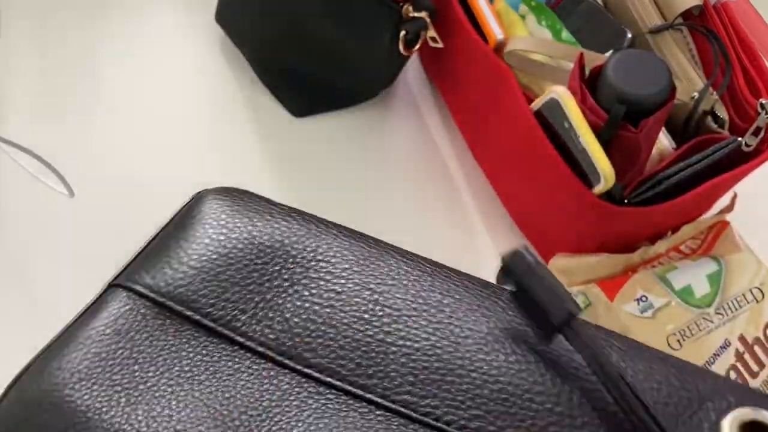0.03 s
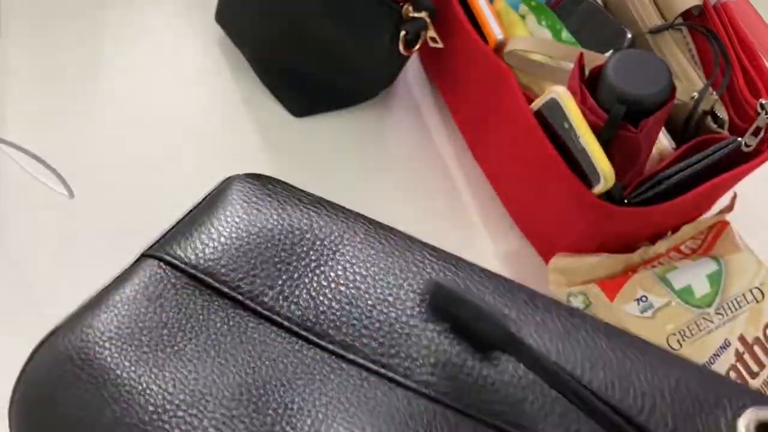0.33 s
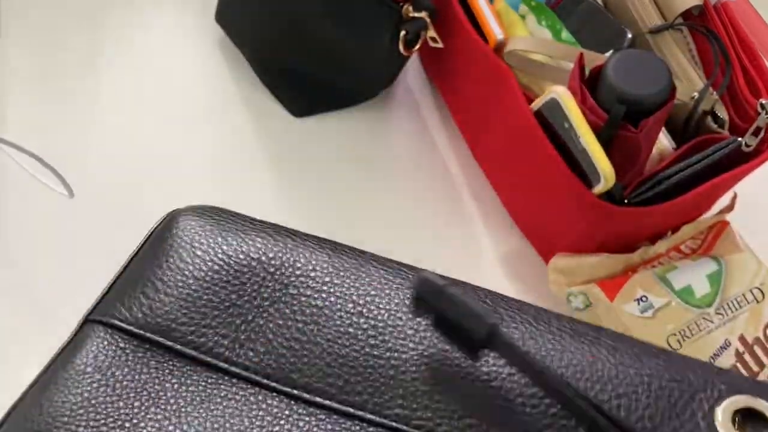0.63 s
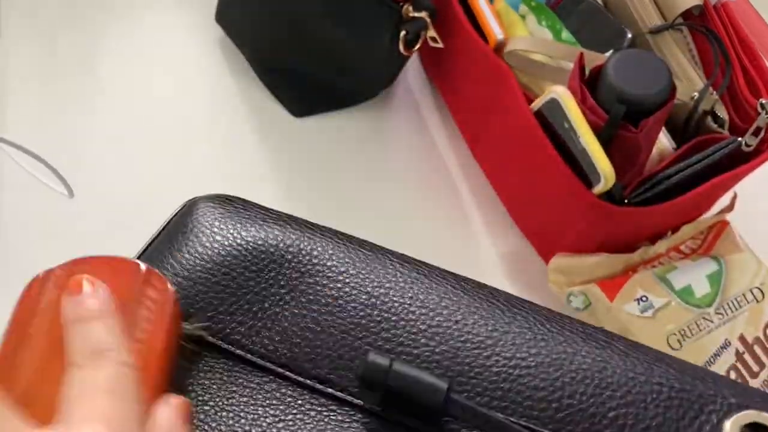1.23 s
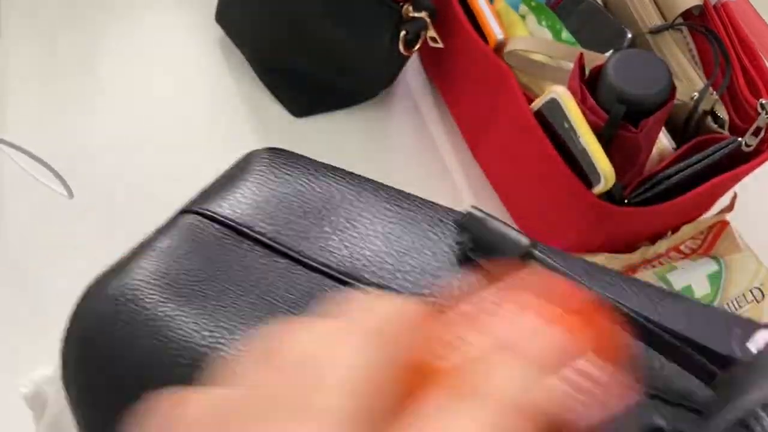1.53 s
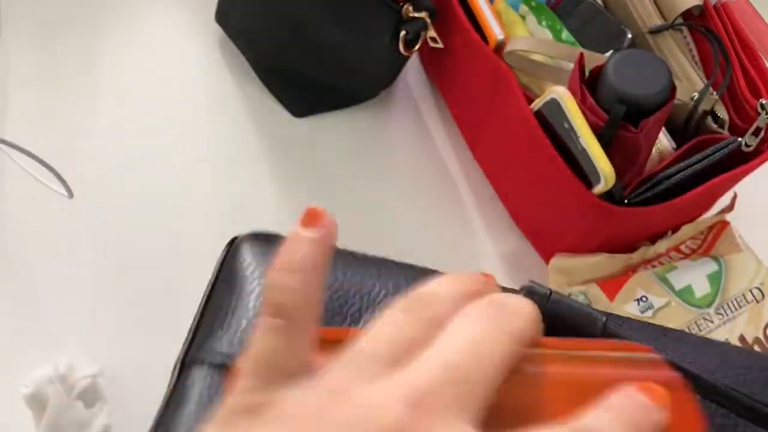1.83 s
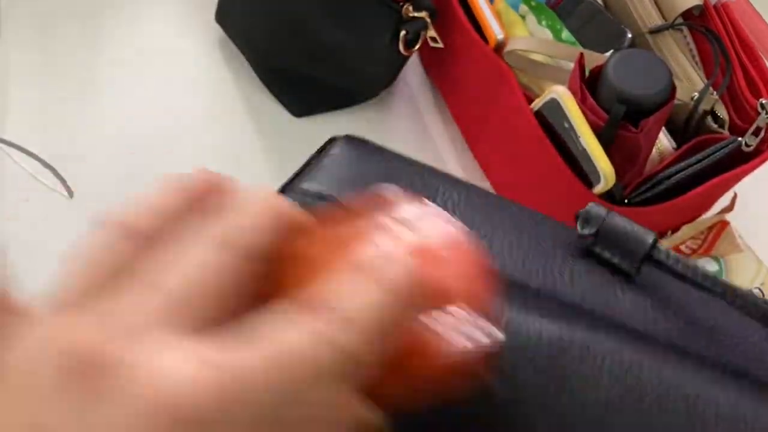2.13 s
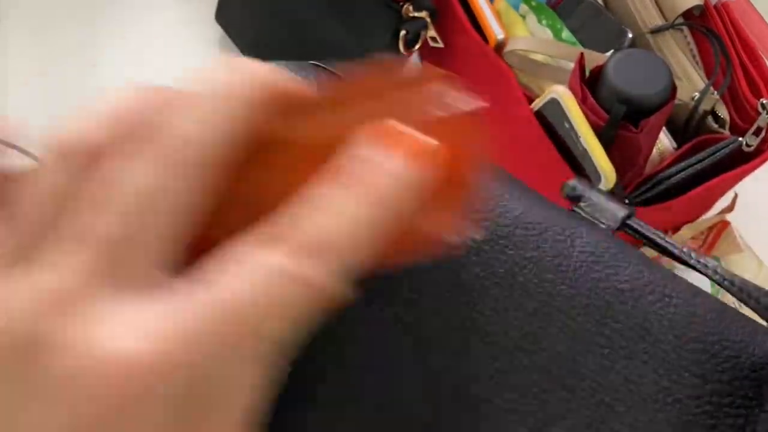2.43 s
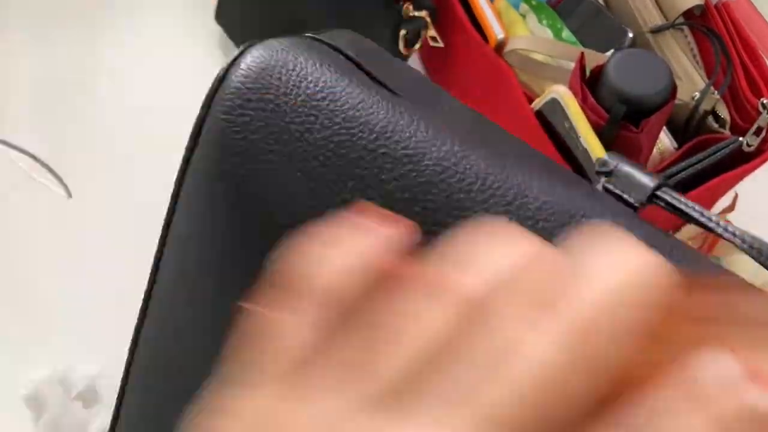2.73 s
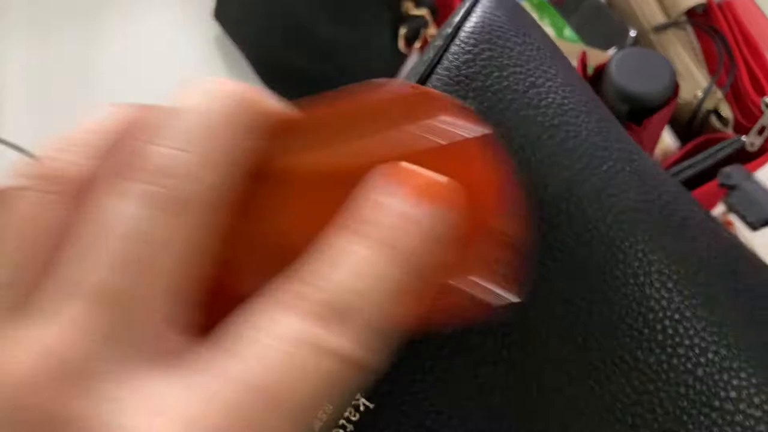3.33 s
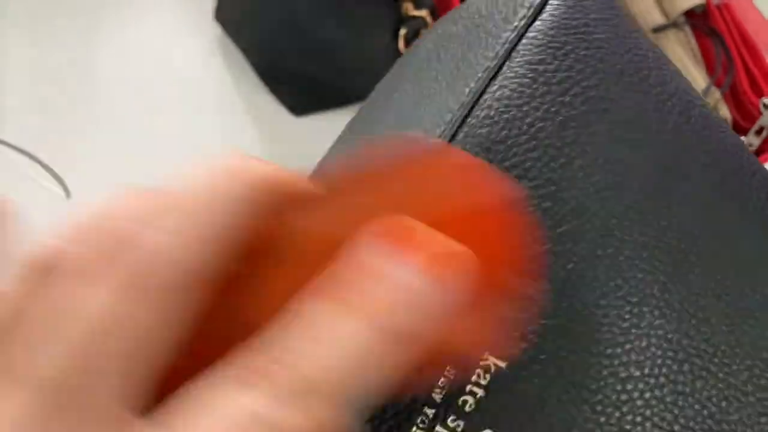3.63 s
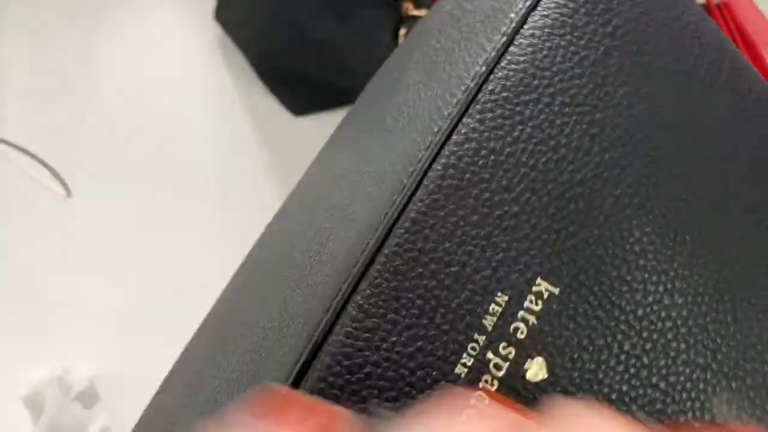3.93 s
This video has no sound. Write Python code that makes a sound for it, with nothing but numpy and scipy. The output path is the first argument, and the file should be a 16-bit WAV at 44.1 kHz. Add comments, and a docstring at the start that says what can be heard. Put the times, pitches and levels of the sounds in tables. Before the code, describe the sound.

A hand brush scrubs a leather handbag in rapid, hissing strokes, close by in a quiet room. The hollow bag rumbles and thumps as it shifts, the plastic brush back taps a few times, and the scrubbing grows slightly louder.

```python
"""Brushing a leather handbag

A hand brush scrubs a bag on a table in a quiet room, about eight strokes a second. Bristles flick over
the grain (hiss), the leather panel rasps and the hollow bag rumbles. The bag thumps as it is pushed
about, the brush slaps the leather, and its hard plastic back taps a few times."""
import sys
import numpy as np
from scipy import signal
from scipy.fft import rfft, irfft
from scipy.io import wavfile
from scipy.ndimage import uniform_filter1d

SR = 44100
rng = np.random.default_rng(int(sys.argv[2]) if len(sys.argv) > 2 else 0)


def to_wav(sig):
    """Store sig (one row per channel, or 1-D mono) as 16-bit WAV at the path in sys.argv[1].

    Samples outside -1..1 are clipped; the rate is SR.
    """
    pcm = np.clip(np.atleast_2d(sig), -1, 1) * 32767
    pcm = np.round(pcm).astype(np.int16)
    wavfile.write(sys.argv[1], SR, pcm.T)  # frames by channels


N = 176400

# brush strokes (start [s], length [s], fastest point [share of length],
# relative hiss [dB], relative rasp [dB], relative rumble [dB])
STROKES = [(-0.075, 0.14, 0.3, -32.5, -41.5, -41.5), (0.033, 0.17, 0.57, -34.5, -42.5, -49),
           (0.172, 0.18, 0.48, -33.5, -41.5, -45), (0.333, 0.16, 0.55, -34, -40.5, -43),
           (0.461, 0.16, 0.52, -33, -42, -42.5), (0.604, 0.14, 0.56, -34.5, -41, -43.0),
           (0.719, 0.15, 0.55, -31.5, -42, -45.5), (0.852, 0.16, 0.28, -35, -42, -47),
           (0.973, 0.14, 0.61, -32.5, -40.5, -47), (1.086, 0.19, 0.4, -39, -44, -44),
           (1.324, 0.12, 0.64, -42.5, -49.0, -47.5), (1.415, 0.19, 0.49, -41, -45.0, -43),
           (1.566, 0.18, 0.44, -35, -40.5, -39), (1.684, 0.15, 1, -39, -44.5, -49.5),
           (1.804, 0.13, 0.95, -39.5, -46, -44), (1.913, 0.15, 0.51, -33, -47, -49),
           (2.033, 0.15, 0.46, -35.0, -43, -44.5), (2.221, 0.055, 0.44, -46, -42, -37),
           (2.271, 0.15, 0.16, -32.5, -37.5, -45), (2.387, 0.13, 0.56, -34, -39.5, -45.5),
           (2.504, 0.15, 0.28, -30.5, -37.5, -42), (2.632, 0.13, 0.67, -30.5, -38, -42),
           (2.737, 0.14, 0.41, -31, -39, -42), (2.857, 0.15, 0.44, -34.5, -44, -47),
           (2.97, 0.13, 0.63, -35, -43, -45), (3.08, 0.17, 0.6, -34.5, -43, -47),
           (3.224, 0.14, 0.39, -30, -41, -43.5), (3.348, 0.13, 0.52, -28, -41.5, -43.5),
           (3.453, 0.15, 0.32, -28, -39, -43), (3.578, 0.15, 0.55, -31, -41.5, -40.5),
           (3.715, 0.13, 0.45, -29.0, -43, -43.5), (3.832, 0.13, 0.43, -29, -41, -45),
           (3.948, 0.1, 0.42, -34, -44, -44.5)]
# modes of the hollow bag (frequency [Hz], level [dB], t60 [s])
BAG_MODES = [(207.8, -17, 0.16), (241, -15, 0.061), (303.3, -14, 0.072), (420, -29, 0.071),
             (574, -22.5, 0.045), (882, -27, 0.11)]


def undb(db):
    """Decibels to gain."""
    return 10 ** (np.asarray(db) / 20)


def unit(x):
    """Scale to rms 1."""
    return x / np.sqrt(np.mean(x ** 2))


def colour(x, points, share=1):
    """Filter by (frequency [Hz], gain [dB]) points on a log-frequency axis."""
    hz, db = np.array(points, float).T
    bins_hz = np.maximum(np.arange(N // 2 + 1) * SR / N, 1)
    return irfft(rfft(x) * undb(share * np.interp(np.log(bins_hz), np.log(hz), db)), N)


def seesaw(x, hz, db):
    """Raise the band above hz and lower the band below by a moving amount."""
    low = colour(x, [(hz * 0.35, 0), (hz, -6), (hz * 1.14, -40)])
    return low * undb(-db) + (x - low) * undb(db)


def walk(rate_hz):
    """Smooth random wander, rms 1."""
    hold = max(int(SR / rate_hz), 2)
    steps = np.repeat(rng.standard_normal(N // hold + 1), hold)
    return unit(uniform_filter1d(steps, hold)[:N])


def ticks(per_s, spread_db):
    """Random impulses of uneven size, rms 1."""
    impulses = (rng.random(N) < per_s / SR) * np.sign(rng.standard_normal(N))
    return unit(impulses * undb(spread_db * rng.standard_normal(N)))


def add(track, at_s, sound):
    """Mix a sound in at a time."""
    i = int(at_s * SR)
    track[i:i + len(sound)] += sound[:N - i]


def ring(t, hz, t60_s):
    """Decaying sine."""
    return np.sin(2 * np.pi * hz * t) * np.exp(-np.log(1000) * t / t60_s)


def rings(t, modes):
    """Modes struck together."""
    return sum(undb(db) * ring(t, hz, t60_s) for hz, db, t60_s in modes)


def scrub(levels_db, power, rest_db):
    """Stroke envelope: a power of brush speed, with bristles still creeping at the turns."""
    # harder scratches over seams and edges (time [s], gain [dB])
    seams = [(.3, 2), (0.935, 8), (1.195, 5), (1.524, 2.5), (3.613, 7)]
    t, strokes = np.arange(N) / SR, np.zeros(N)
    bump = lambda at_s, width_s: np.exp(-((t - at_s) / width_s) ** 2)
    for (start_s, length_s, fastest, *_), db in zip(STROKES, levels_db):
        knots_s = start_s + length_s * np.array([0, np.clip(fastest, .2, .8), 1])
        speed = np.abs(np.sin(np.pi * np.interp(t, knots_s, [0, .5, 1])))
        strokes += undb(db) * speed ** power
    drift_db = 13.5 * bump(1.295, 0.083)  # brush drags on while the hand shifts
    lift_db = -14 * bump(2.212, 0.0079)  # brush leaves the leather
    creep = uniform_filter1d(strokes, size=SR // 3) * undb(rest_db + lift_db + drift_db)
    seam_db = sum(db * bump(at_s, 0.018) for at_s, db in seams)
    return np.hypot(strokes, creep) * undb(seam_db)


def room(air_db=-54.5, hum_hz=101.2, hum_db=-57.5):
    """Quiet room air with a faint mains hum."""
    # air spectrum (frequency [Hz], level [dB])
    air_spectrum = [(20, -11), (55, 3.5), (140, 5), (250, -14), (500, -3), (1200, -6.5), (3000, -37),
                    (8000, -33), (16000, -15.5)]
    air = rng.standard_normal(N) + .5 * rng.standard_normal((2, N))
    hum = np.sin(2 * np.pi * hum_hz * np.arange(N) / SR)
    return undb(air_db) * unit(colour(air, air_spectrum)) + undb(hum_db) * unit(hum)


def echo(pair, gain_db=-10.5, t60_s=0.18):
    """Short diffuse reflections off table and walls, with a dull top."""
    # reflection colour (frequency [Hz], gain [dB])
    response = [(90, -2.5), (280, 2.5), (2000, 1), (5000, 10.5), (9000, -14.5)]
    t = np.arange(SR // 3) / SR
    tail = rng.standard_normal((2, len(t))) * np.exp(-np.log(1000) * t / t60_s) * (t > .003)
    tail /= np.sqrt(np.sum(tail ** 2, axis=1, keepdims=True))
    return undb(gain_db) * colour(signal.fftconvolve(pair, tail, axes=1)[:, :N], response)


def table_shake(rumble_db, level_db=-48):
    """The scrubbing arm shakes the table along with the bag."""
    # shake spectrum (frequency [Hz], level [dB])
    spectrum = [(20, -22), (35, -5.5), (55, 5), (75, 3), (105, 2.5), (150, -3.5), (300, -46)]
    shake = rng.standard_normal(N) + 0.11 * rng.standard_normal((2, N))
    force = scrub(0.97 * rumble_db, power=0.68, rest_db=-19)
    return undb(level_db) * unit(colour(shake, spectrum) * force)


def lean(pair):
    """The bag radiates its midrange more to the right."""
    # balance (frequency [Hz], left minus right [dB])
    balance = [(150, 2), (300, -1), (550, -6), (1100, -9), (2000, -3), (4000, -0.5)]
    return np.array([colour(pair[0], balance, 1 / 2), colour(pair[1], balance, -1 / 2)])


def plastic_taps(bounce_s=0.00238, bounce_db=-8.5, scrape_s=0.001, detune=.015):
    """A short rough contact rings the plastic brush back and bounces once."""
    # taps (time [s], level [dB], tilt [dB/octave])
    hits = [(1.193, -28, -5), (1.524, -30, -1), (1.893, -37, 1), (2.2435, -29, 0), (2.4705, -18.5, 0),
            (2.7235, -21, -3)]
    # plastic modes (frequency [Hz], level [dB], t60 [s])
    modes = [(1157, -5, .013), (1717, 1, .009), (2050, -2, .009), (3354, -3, .014), (3822, -5, .015)]
    out, t = np.zeros(N), np.arange(SR // 10) / SR
    for at_s, db, tilt in hits:
        for delay_s, contact_db in ((0, 0), (bounce_s, bounce_db)):
            plastic = np.zeros(len(t))
            for k, (hz, mode_db, t60_s) in enumerate(modes):
                gain = (-1) ** k * undb(mode_db + tilt * np.log2(hz / 1500))
                plastic += gain * ring(t, hz * (1 + detune * rng.standard_normal()), t60_s)
            scrape = uniform_filter1d(rng.standard_normal(len(t)), size=10) * np.exp(-t / scrape_s)
            add(out, at_s + delay_s, undb(db + contact_db) * (.5 * plastic + scrape))
    return out


def brush_slaps(sweep_hz=1303, sweep_s=0.001052, attack_s=0.0017):
    """Brush hits taut leather: fast bending waves arrive first, so pitch drops; panel and bag ring."""
    # slaps (time [s], level [dB], final pitch [Hz], decay [s])
    hits = [(0.375, -30.5, 313, 0.01), (0.6416, -29.5, 340, 0.0089), (0.8698, -30, 288, 0.0097),
            (1.1223, -28, 334, 0.0098), (1.1926, -19.5, 416, 0.0017), (1.425, -29.5, 336, 0.008),
            (1.893, -28.5, 229, 0.011), (2.2447, -26.5, 210, .0055), (2.276, -29, 260, 0.0026),
            (2.292, -31.5, 260, 0.0042), (2.722, -29, 337, 0.0047), (3.1225, -27.5, 378, 0.0031),
            (3.37, -29.5, 266, 0.0082), (3.859, -32.5, 402, 0.0028)]
    # leather panel modes (frequency [Hz], relative level [dB], t60 [s])
    panel_modes = [(597, 7, 0.02), (770, 2, 0.022), (1097, -3, 0.05), (1280, -14, 0.031)]
    out, t = np.zeros(N), np.arange(SR // 4) / SR
    ringing = rings(t, BAG_MODES) + undb(-15) * rings(t, panel_modes)
    for at_s, db, hz, decay_s in hits:
        cycles = hz * t + sweep_hz * sweep_s * (1 - np.exp(-t / sweep_s))
        bend = np.sin(2 * np.pi * cycles) * np.exp(-(t / decay_s) ** 2)
        add(out, at_s, undb(db) * (bend + ringing) * np.minimum(t / attack_s, 1))
    return out


def bag_thumps(attack_s=0.0047, sag=0.22, crumple_db=-16):
    """A push crumples the panel, which rings unevenly and sags in pitch; the hollow bag rings on."""
    # buckles and bumps (time [s], level [dB], final pitch [Hz], t60 [s])
    hits = [(.288, -30.5, 234, 0.069), (.378, -30, 300, 0.075), (.915, -23.5, 365, 0.032),
            (1.145, -26, 237, .03), (1.165, -23, 268, 0.027), (1.1962, -9, 246, 0.037),
            (1.216, -27, 243, 0.081), (1.246, -30, 258, 0.17), (1.431, -30, 242, .17),
            (1.645, -38, 282, 0.054), (1.668, -26, 187, 0.17), (1.711, -29, 141, 0.13),
            (1.771, -33.5, 192.5, 0.2), (1.898, -26, 215, 0.082), (2.294, -27, 229, 0.13),
            (2.475, -25, 239, 0.042), (3.264, -26, 213, 0.072), (3.37, -32, 223, 0.038),
            (3.625, -20.5, 159, 0.045), (3.877, -21.5, 113, .03)]
    out, t = np.zeros(N), np.arange(SR // 4) / SR
    for at_s, db, hz, t60_s in hits:
        sag_s = 0.081 * t60_s
        warped_s = t + sag * sag_s * (1 - np.exp(-t / sag_s))
        crumple = 1 + undb(crumple_db) * unit(uniform_filter1d(rng.standard_normal(len(t)), size=120))
        body = ring(warped_s, hz, t60_s) * crumple + rings(t, BAG_MODES)
        add(out, at_s, undb(db) * body * np.minimum(t / attack_s, 1))
    return out


def bag_rumble(levels_db, width=0.37):
    """The soft hollow body rumbles as it is dragged to and fro."""
    # rumble spectrum (frequency [Hz], level [dB])
    spectrum = [(40, -35), (90, -7), (140, -9), (210, 0.5), (310, -1.5), (420, -10.5), (800, -23),
                (2000, -70)]
    mid, side = ticks(per_s=1500, spread_db=2.5), width * rng.standard_normal(N)
    pair = np.array([mid + side, mid - side])
    return unit(colour(pair, spectrum)) * scrub(levels_db - 3, power=.5, rest_db=-8.5)


def leather_rasp(levels_db, judder_db, width=0.69, turned_s=2):
    """Tufts catch on the grain and shake the side panel, then the front once the bag is turned."""
    # narrow side panel (frequency [Hz], level [dB])
    side_spectrum = [(200, -9), (400, -1.5), (530, 2.5), (760, -8.5), (1100, 0), (1650, -3.5), (2030, 0.5),
                     (2450, -4), (3800, -11), (6500, -18)]
    # broad front panel (frequency [Hz], level [dB])
    front_spectrum = [(200, -27), (400, -3), (550, 2.5), (760, -11.5), (1100, 0.5), (1600, -5), (2100, -2),
                      (2600, -3.5), (3800, -10), (6500, -18)]
    # phase between channels (frequency [Hz], left minus right [rad])
    phase = [(200, 0), (1200, -.5), (2000, -2), (2450, -4), (3100, -2), (3800, -6.2), (4400, -6.4),
             (5000, -10)]
    mid, side = (ticks(per_s=1600, spread_db=2.5) for _ in range(2))
    phase_rad = np.interp(np.arange(N // 2 + 1) * SR / N, *np.array(phase).T)
    right = irfft(rfft(mid - width * side) * np.exp(-1j * phase_rad), N)
    pair = np.array([mid + width * side, right])
    panel = np.where(np.arange(N) / SR < turned_s,
                     unit(colour(pair, side_spectrum)), unit(colour(pair, front_spectrum)))
    force = scrub(levels_db - 2, power=1.46, rest_db=-12.5)
    patch_db = 3 * walk(rate_hz=27)  # colour shifts as the brush crosses the panel
    return seesaw(panel, hz=1340, db=patch_db) * force * undb(judder_db)


def bristle_hiss(levels_db, judder_db, width=.14, right_lag_s=.000297, right_phase_rad=2.4):
    """Dense flicks of bristle tips, brighter when pressed hard, arriving later on the right."""
    # hiss spectrum (frequency [Hz], level [dB])
    spectrum = [(1500, -14.5), (3500, -16), (5000, -16.5), (6500, -6), (8000, -1.5), (9400, 1.5),
                (11000, -1), (13000, -5), (15500, -12.5)]
    flicks = ticks(per_s=11000, spread_db=0.5)
    bins_hz = np.arange(N // 2 + 1) * SR / N
    right = irfft(rfft(flicks) * np.exp(1j * (right_phase_rad - 2 * np.pi * bins_hz * right_lag_s)), N)
    pair = np.array([flicks, right]) + width * rng.standard_normal((2, N))
    force = scrub(levels_db + 0.5, power=1.99, rest_db=-14)
    bright_db = 1.2 * np.log10(unit(force) + 1e-3)
    bright_db += 2.7 * walk(rate_hz=27)  # tufts bend unevenly
    return seesaw(unit(colour(pair, spectrum)), hz=10140, db=bright_db) * force * undb(judder_db)


def scene():
    """Hiss and rasp share one judder; the room surrounds brush and bag."""
    hiss_db, rasp_db, rumble_db = np.array(STROKES, float).T[3:]
    judder_db = walk(rate_hz=305.7)
    hiss = bristle_hiss(hiss_db, judder_db)
    rubbing = leather_rasp(rasp_db, judder_db) + bag_rumble(rumble_db)
    knocks = bag_thumps() + brush_slaps() + plastic_taps()
    near = hiss + lean(rubbing + knocks)
    return near + echo(near) + table_shake(rumble_db) + room()


def record(dry, cutoff_hz=15850):
    """The phone cuts the top steeply."""
    return signal.sosfilt(signal.ellip(10, .2, 80, cutoff_hz, fs=SR, output="sos"), dry)


dry = scene()
out = record(dry)
to_wav(out)
```